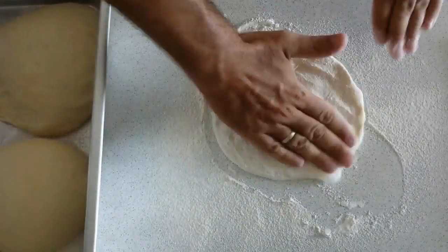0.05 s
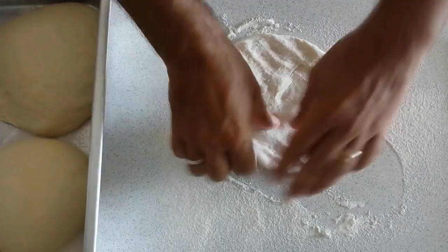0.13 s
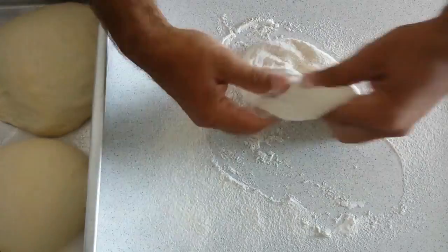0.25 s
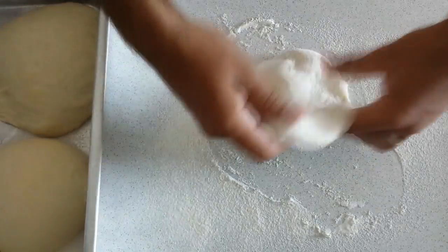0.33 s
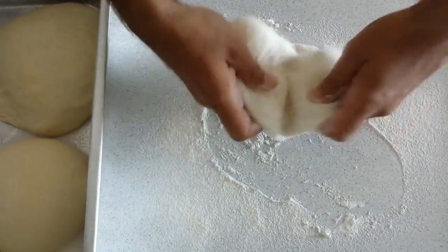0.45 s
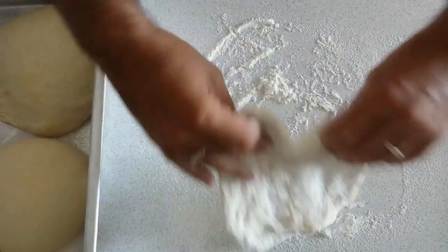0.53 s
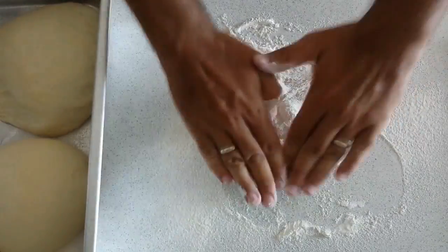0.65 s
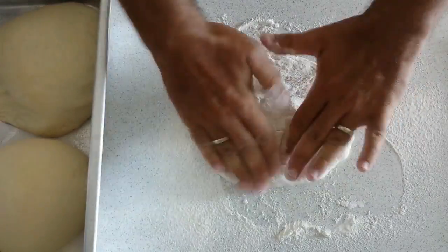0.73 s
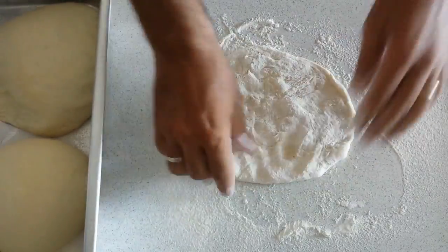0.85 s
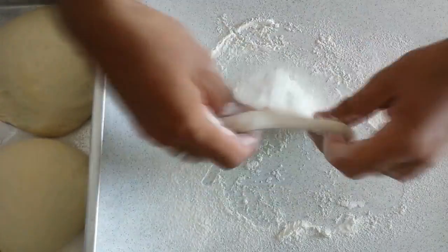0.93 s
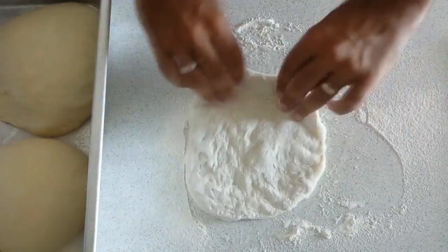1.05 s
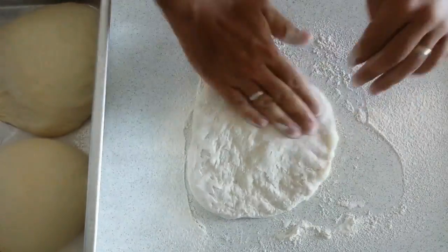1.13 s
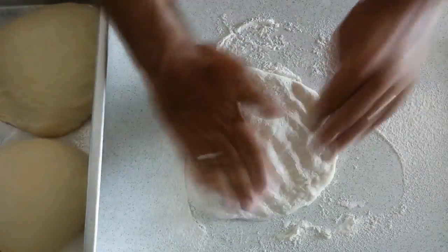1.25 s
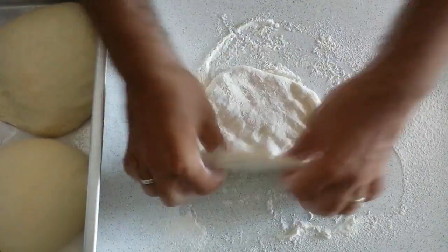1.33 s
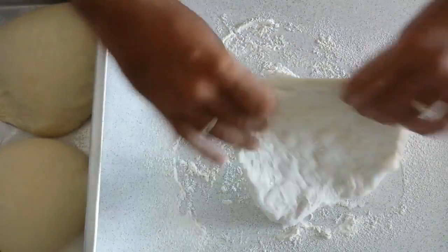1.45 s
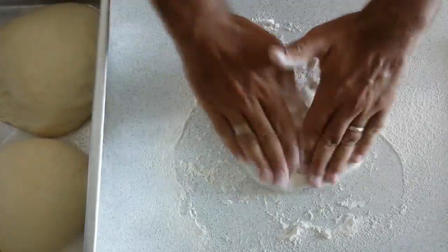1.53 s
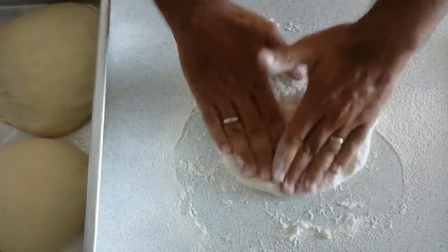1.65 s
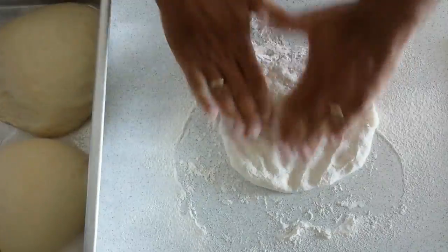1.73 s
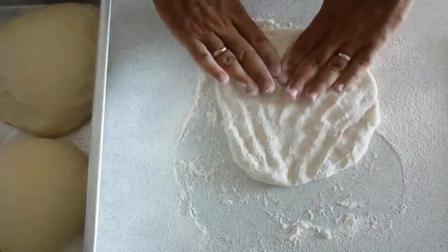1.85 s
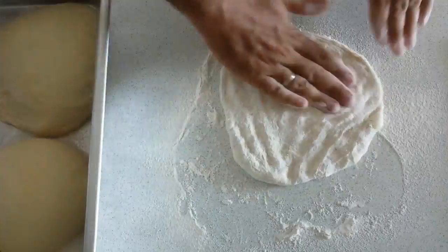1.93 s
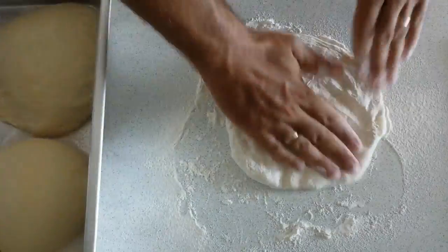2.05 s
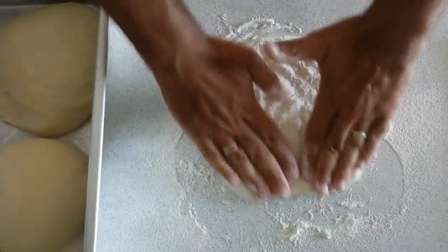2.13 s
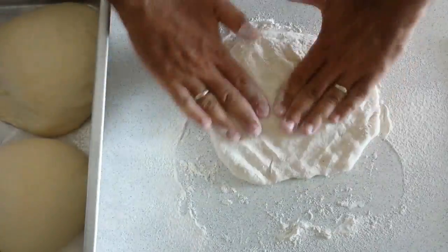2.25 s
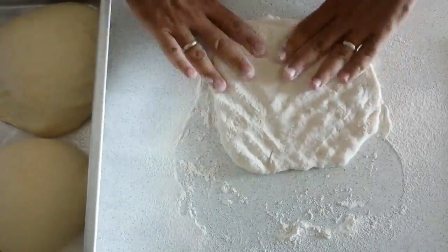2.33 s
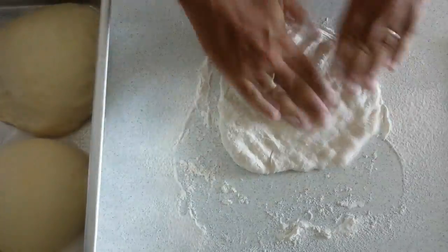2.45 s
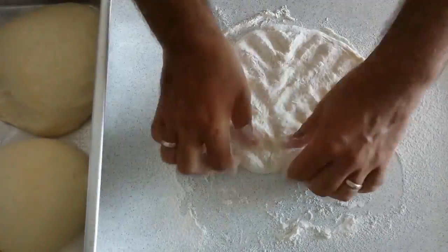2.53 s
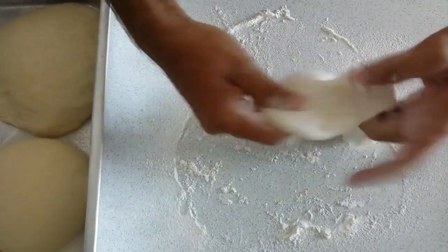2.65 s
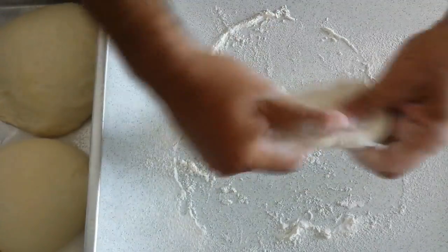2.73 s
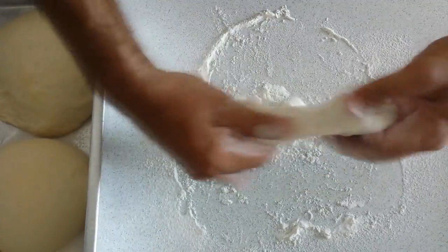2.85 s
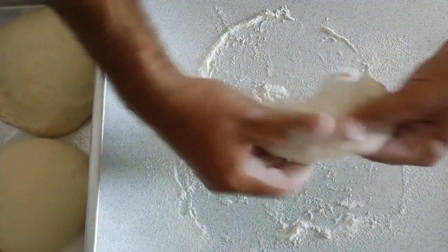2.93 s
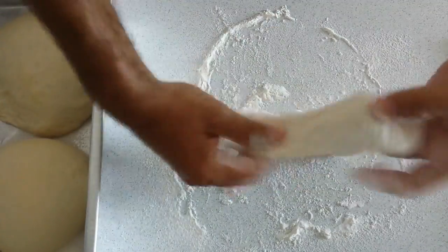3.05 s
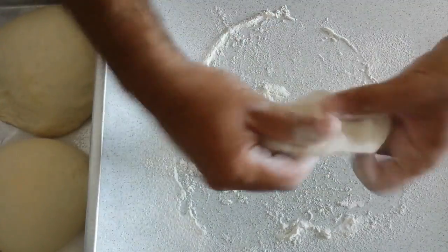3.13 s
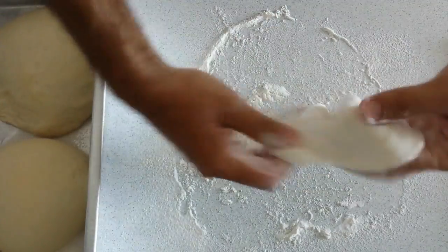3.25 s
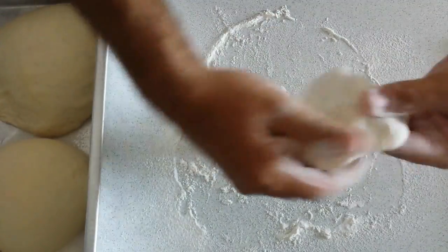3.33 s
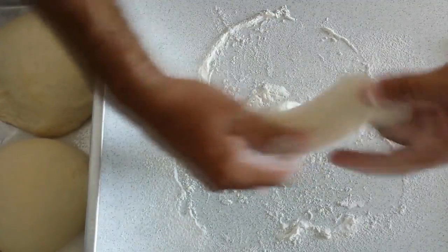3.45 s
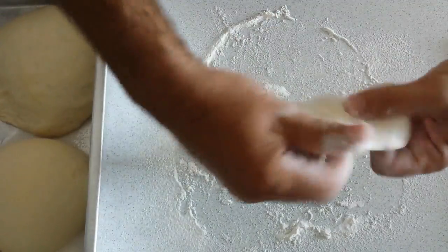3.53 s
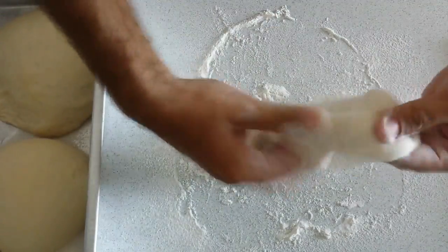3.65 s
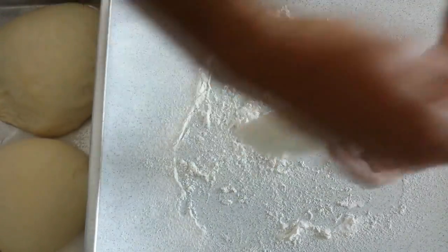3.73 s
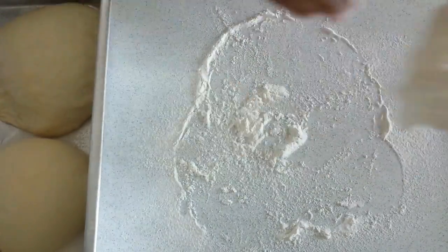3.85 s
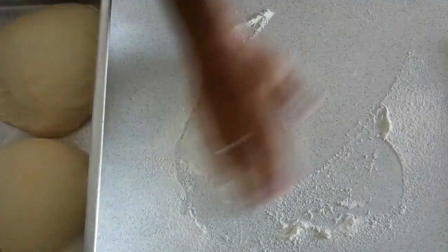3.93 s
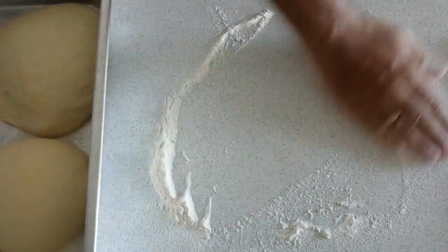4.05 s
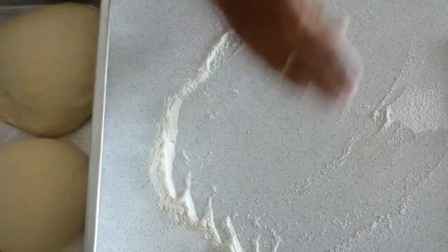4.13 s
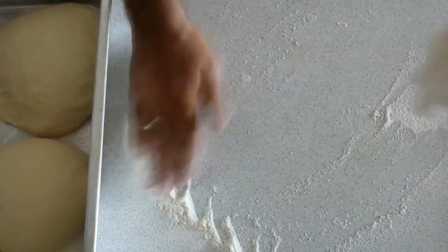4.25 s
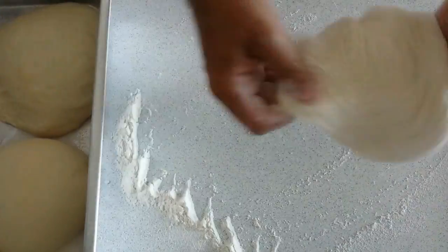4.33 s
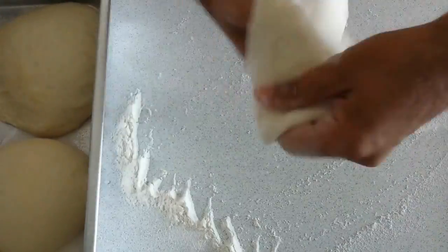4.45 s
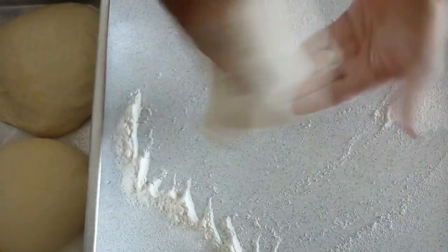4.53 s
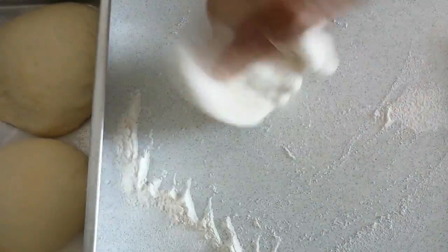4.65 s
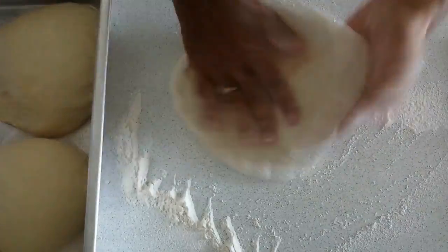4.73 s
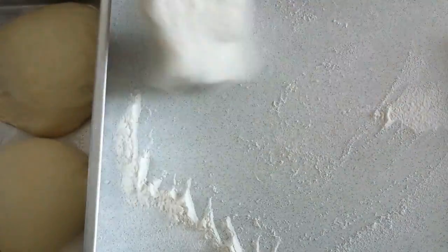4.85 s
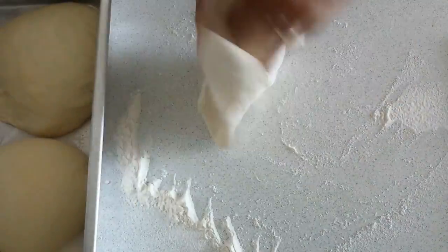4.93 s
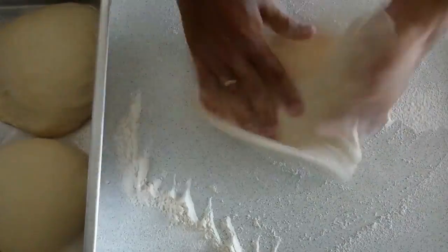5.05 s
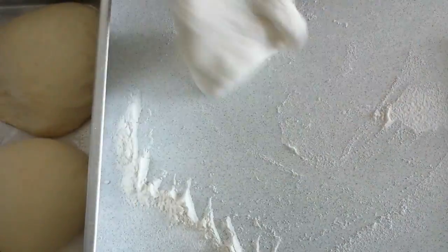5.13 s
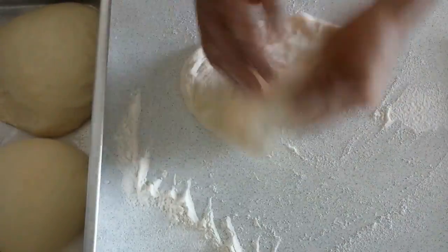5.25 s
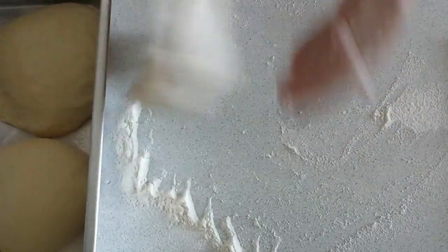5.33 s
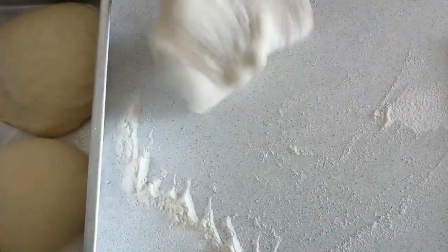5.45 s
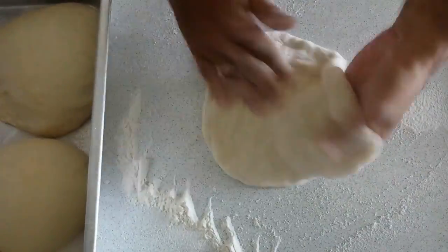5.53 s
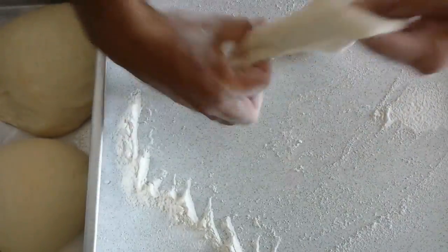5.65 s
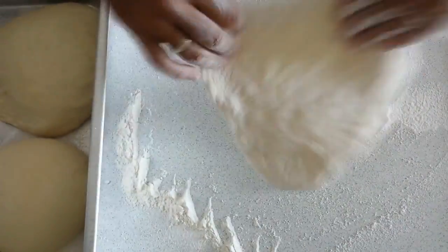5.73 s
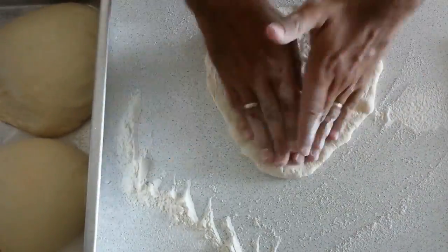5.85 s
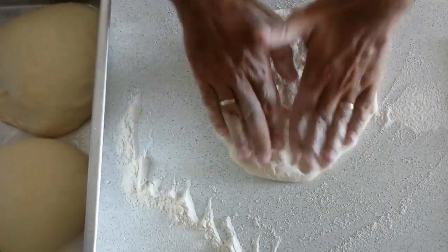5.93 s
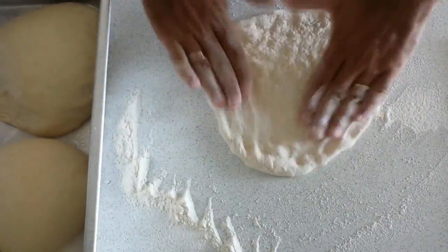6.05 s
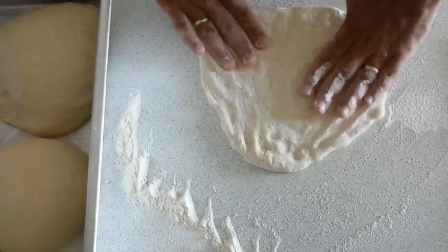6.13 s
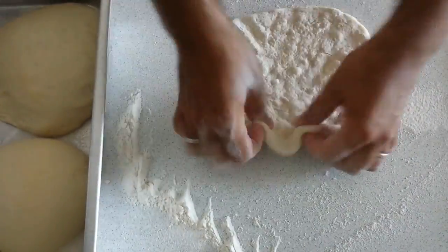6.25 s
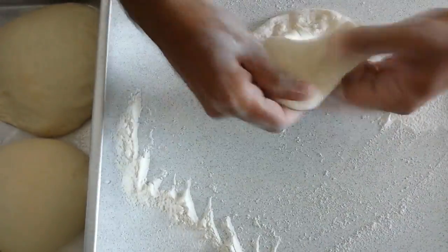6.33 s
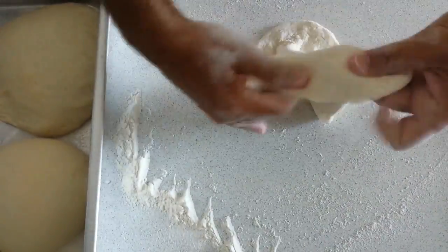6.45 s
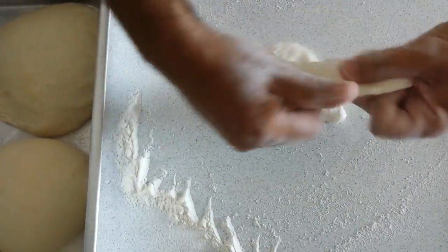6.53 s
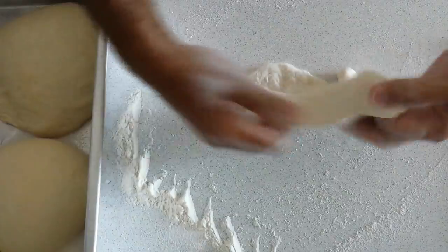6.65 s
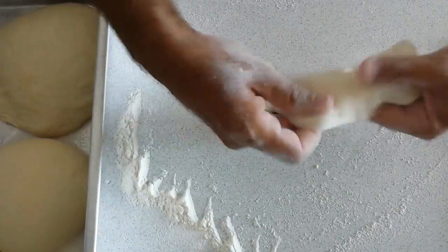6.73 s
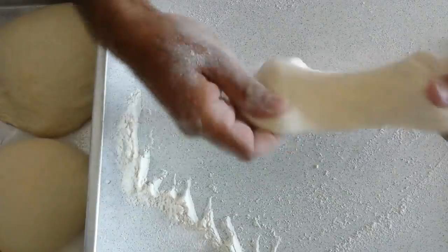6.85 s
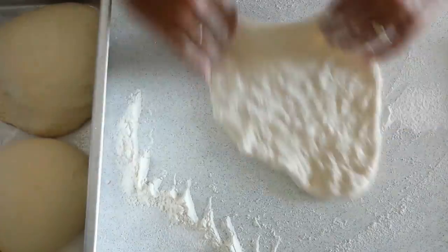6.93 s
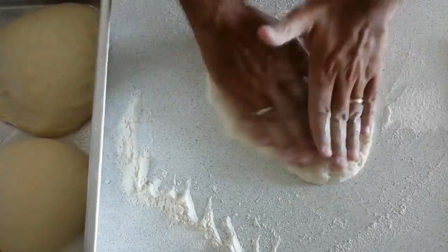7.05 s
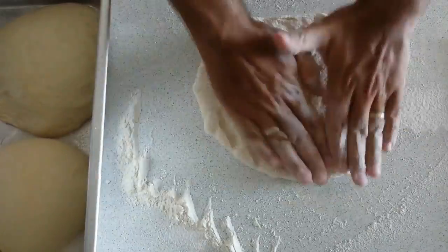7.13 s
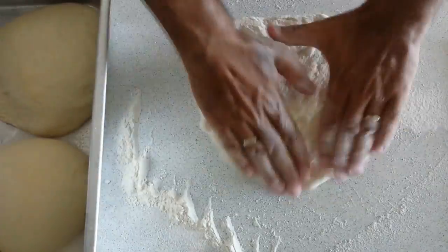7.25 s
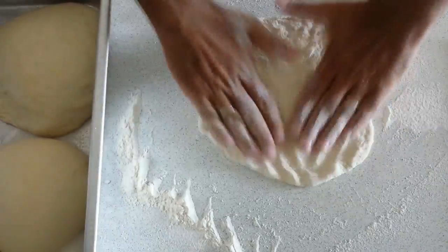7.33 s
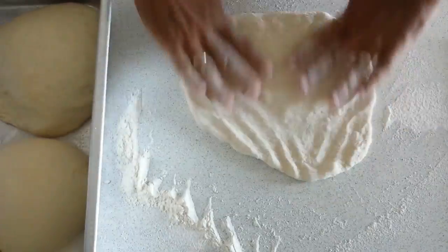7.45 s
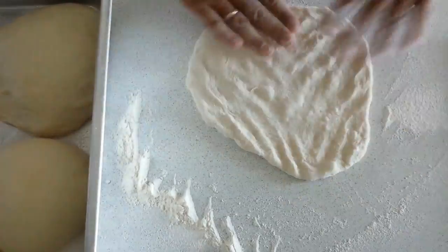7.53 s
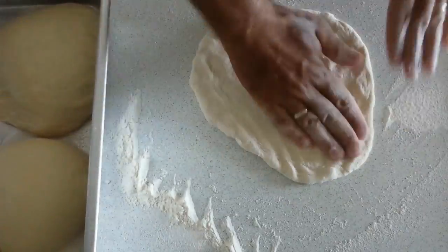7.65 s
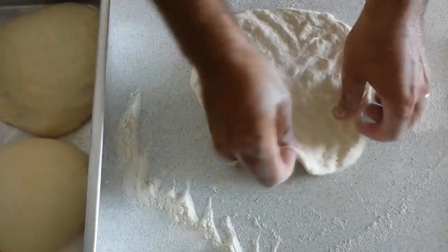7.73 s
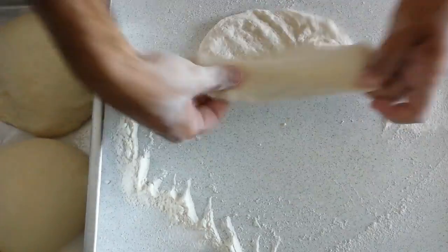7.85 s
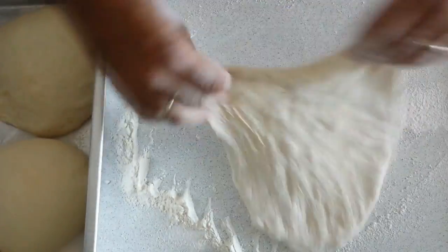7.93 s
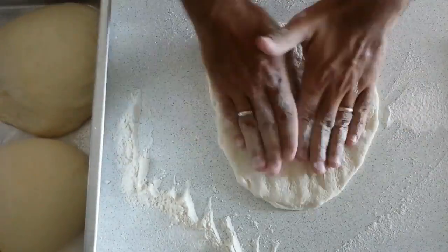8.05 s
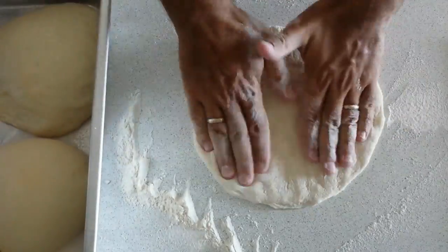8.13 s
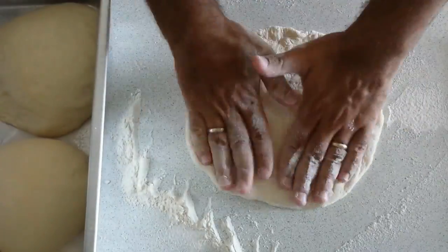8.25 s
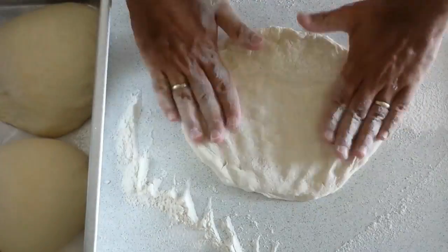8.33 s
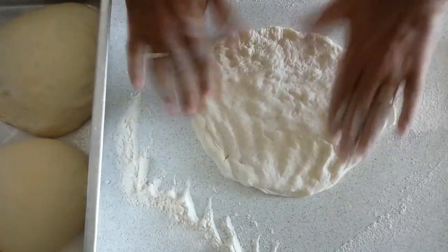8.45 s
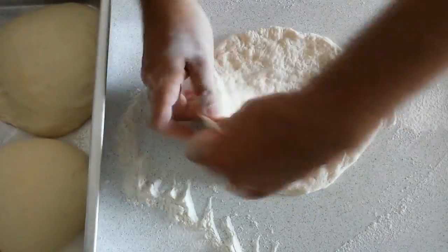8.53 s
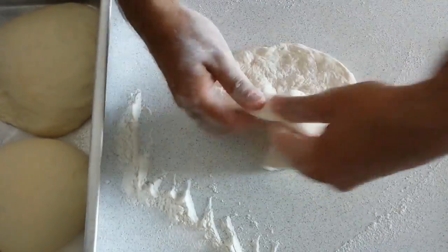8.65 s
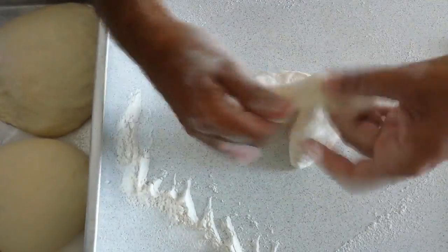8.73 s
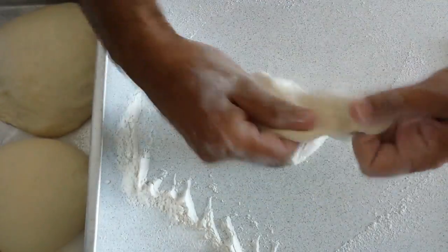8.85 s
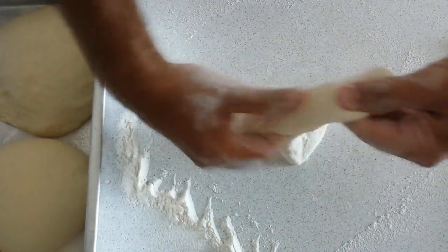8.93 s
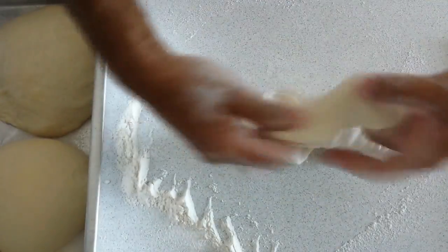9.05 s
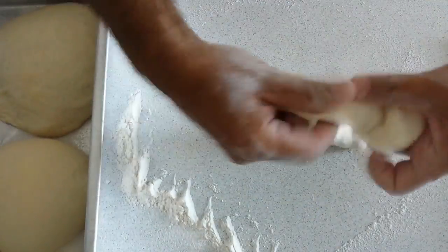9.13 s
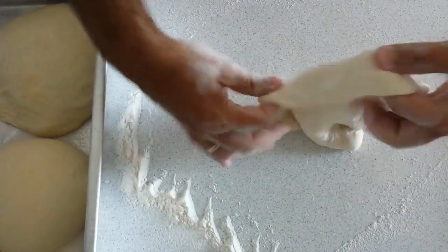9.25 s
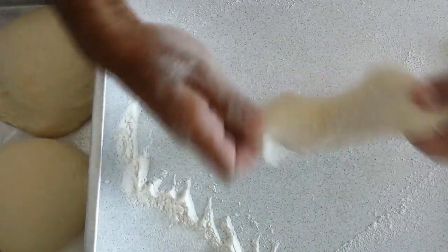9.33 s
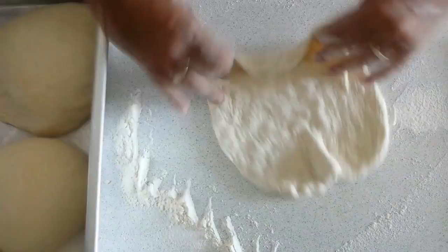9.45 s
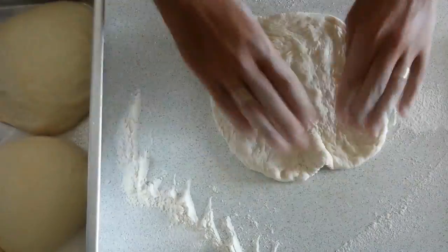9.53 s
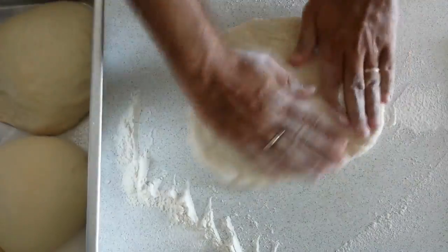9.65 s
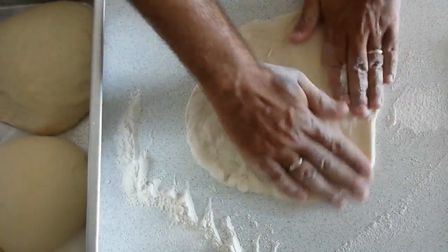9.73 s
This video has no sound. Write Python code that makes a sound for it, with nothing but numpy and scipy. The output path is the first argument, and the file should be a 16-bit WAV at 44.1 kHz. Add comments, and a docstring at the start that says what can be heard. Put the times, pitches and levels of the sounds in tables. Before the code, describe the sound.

Hands work soft dough on a floured counter, close to a stereo microphone and slightly to the right. For the first 2.7 seconds, soft, irregular pats thump the worktop with light knocks and finger ticks. From about 3 seconds the lifted dough rasps quietly through floury fingers. Just after 4 seconds a hand sweeps flour aside in three quick, hissing strokes. Between 4.7 and 5.9 seconds the dough slaps from palm to palm with hollow claps and thumps, loudest around 5.5. A few light pats and more rubbing follow, then firmer pats from 7.4 seconds, hardest near 7.8, and another pair at 8.5. The fingers rub again around 9 seconds, and one last slap lands at 9.6. Throughout, the kneading rumbles faintly in the counter over the slight hiss and hum of a small kitchen.

```python
"""Pizza dough on a floured kitchen counter, close under a camera's stereo microphone. First soft pats thump the
worktop. The dough is lifted and fed through rasping, floury fingers, and at 4 s a hand sweeps the flour aside.
Then the dough slaps from palm to palm, clapping out trapped air. The pats return, hardest near 7.8 s, and one
last slap follows. All along, the kneading rumbles in the counter with a low, wavering hum, and the small room
hisses faintly."""
import sys
import numpy as np
from scipy import signal
from scipy.fft import rfft, irfft, next_fast_len
from scipy.io import wavfile
from scipy.ndimage import map_coordinates

SR = 44100
rng = np.random.default_rng(int(sys.argv[2]) if len(sys.argv) > 2 else 0)


def waveform_to_disk(signal):
    """Save audio, clipped to [-1, 1], as 16-bit WAV at the path in sys.argv[1]."""
    frames = np.transpose(np.atleast_2d(signal))
    scaled = np.clip(frames, -1, 1) * 32767
    samples = np.round(scaled).astype(np.int16)
    wavfile.write(sys.argv[1], SR, samples)


N = 431738
TIME = np.arange(N) / SR


# The worktop's low modes. Each row: pitch in Hz, t60 in seconds, level in dB.
THUMP_MODES = [(129, 0.064, 1), (71.3, 0.028, -2), (196, 0.055, -9)]
# Its higher modes, woken by firm contact. Each row: pitch in Hz, t60 in seconds, level in dB.
KNOCK_MODES = [(360, 0.04, -2), (283.6, 0.024, 6.5), (496, 0.019, -8)]
# Dough pressed on the worktop, close under the microphone.
# Each row: start in seconds, relative level in dB, relative weight of the knock in dB.
PATS = [(0.236, -35, -26), (0.313, -39, -10), (0.898, -29, -16.5), (1.171, -38.5, -1.5),
        (1.366, -20.5, -23), (1.419, -32.5, -21), (1.499, -26, -21), (1.618, -37.5, -37), (1.815, -37, -15),
        (2.045, -34, -26), (2.102, -27, -20), (2.447, -29.5, -18), (2.553, -34.5, -11.5),
        (2.608, -25, -19.5), (2.703, -30.5, -20.5), (6.383, -28.5, -16), (6.407, -31, -6),
        (6.862, -33.5, -7), (7.444, -28, -21.5), (7.574, -35, -18), (7.672, -27, -38), (7.717, -16, -17.5),
        (7.775, -11, -20.5), (7.803, -21.5, -20), (7.904, -36.5, -9.5), (8.502, -19.5, -20),
        (8.54, -26.5, -18), (8.684, -39, -14)]

def pats():
    """Soft dough passes only a dull push to the worktop; firmer pats add a knock."""
    out = np.zeros((2, N))
    for s, db, knock_db in PATS:
        thump = worktop(THUMP_MODES, attack_s=0.0024, phase_spread=0.55)
        knock = worktop(KNOCK_MODES, attack_s=0.0032, phase_spread=0.49)
        add(out, s, amp(db - 1) * (thump + amp(knock_db + 6) * knock))
    return out


def worktop(modes, attack_s, phase_spread):
    """The worktop rings; each side of the microphone meets each bending wave at its own phase."""
    t = np.arange(SR // 4) / SR
    ring = 0
    for hz, t60, db in modes:
        pitch = hz * np.exp(0.029 * rng.standard_normal())
        phase = phase_spread * rng.standard_normal() * np.array([[1], [-1]])
        ring = ring + amp(db - 60 * t / t60) * np.sin(2 * np.pi * pitch * t + phase)
    ring *= 1 - np.exp(-(t / attack_s) ** 2)
    return ring / np.sqrt(np.mean(ring ** 2, axis=0)).max()


# A slap's air clap, palm boom and skin smack. Each row: frequency in Hz, level in dB.
CLAP_SPECTRUM = [(200, -35), (400, -4), (560, -5), (800, -1.5), (1400, -5.5), (2000, -3), (2700, -15),
                 (4000, -13), (9000, -34)]
BOOM_SPECTRUM = [(150, -43), (270, 1), (340, -0.5), (385, 6.5), (440, -6), (540, -20.5), (800, -57.5)]
SMACK_SPECTRUM = [(900, -30), (2200, 9), (3200, 2.5), (5600, 2.5), (7000, -3.5), (10000, -8), (15500, -15)]
# Dough meeting the palms, above the counter. Each row: time in seconds, relative levels of thump,
# boom, clap and smack in dB, air pocket pitch in Hz, closing time in seconds.
SLAPS = [(4.068, -43, -43, -34, -43, 1610, .015), (4.117, -34.5, -43, -28.5, -37.5, 1410, 0.011),
         (4.743, -42, -27.5, -32, -42, 646, 0.0067), (4.754, -36, -29, -27, -56, 770, 0.02),
         (4.883, -31, -34, -40, -58, 800, 0.028), (4.919, -29.5, -27.5, -25.5, -31.5, 960, 0.013),
         (5.059, -12.5, -26, -25, -30, 890, 0.026), (5.219, -22, -28, -18.5, -26.5, 950, 0.011),
         (5.23, -22.5, -29.5, -29.5, -54, 850, 0.011), (5.38, -15.5, -24.5, -24, -31.5, 856, 0.013),
         (5.539, -10.5, -18.5, -16.5, -26.5, 1400, 0.019), (5.703, -32, -32.5, -30, -30.5, 1300, 0.019),
         (5.923, -25, -35.5, -28.5, -30.5, 1000, 0.0095), (7.099, -38, -36, -34, -36.5, 1400, 0.0083),
         (9.607, -18, -33.5, -25.5, -33.5, 1230, 0.0089)]

def slaps():
    """Skin smacks on dough, trapped air claps and booms in the palm, and the dough's weight thumps."""
    out = np.zeros((2, N))
    for s, thump_db, boom_db, clap_db, smack_db, pocket_hz, closing_s in SLAPS:
        clap_colour = lambda hz: along(CLAP_SPECTRUM, hz) + hollow_db(hz) + pocket_db(hz, pocket_hz, 5.5)
        clap = puff(clap_colour, rise_s=closing_s, t60=0.053)
        boom = puff(lambda hz: along(BOOM_SPECTRUM, hz), rise_s=closing_s, t60=0.057)
        smack = puff(lambda hz: along(SMACK_SPECTRUM, hz), rise_s=2.06 * closing_s, t60=0.069)
        slap = amp(clap_db + 2.5) * clap + amp(boom_db + 1) * boom + amp(smack_db - 2) * smack
        thump = worktop(THUMP_MODES, attack_s=0.0031, phase_spread=0.92)
        add(out, s - PUFF_PEAK_S, slap)
        add(out, s - 0.002, amp(thump_db + 0.5) * thump)
    return out


PUFF_PEAK_S = 0.05

def puff(colour_db, rise_s, t60):
    """Air squeezed out as a contact closes: it swells to a peak and dies."""
    t = np.arange(SR // 4) / SR - PUFF_PEAK_S
    envelope = amp(60 * np.minimum(t / rise_s, -t / t60))
    air = noise(colour_db, size=len(t)) * envelope
    return unit(air) * np.sqrt(np.mean(envelope ** 2))


def pocket_db(hz, centre_hz, lift_db):
    """A trapped air pocket favours the band round its own pitch."""
    return lift_db * np.exp(-(np.log2((hz + 1) / centre_hz) / 0.51) ** 2)


# Fixed resonances that colour sounds near the counter. Each row: centre in Hz, width in Hz, gain in dB.
HOLLOWS = [(370, 27, 15.5), (870, 20, 10.5), (1093, 63, -3), (1360, 92, 1.5), (1770, 92, -1),
           (2030, 130, -2), (2540, 100, 5)]

def hollow_db(hz):
    """The fixed resonances colour a sound with narrow peaks and dips."""
    return sum(db / (1 + (2 * (hz - centre) / width) ** 2) for centre, width, db in HOLLOWS)


# Light finger taps, close by. Each row: time in seconds, relative level in dB, hollow pitch in Hz.
TAPS = [(.318, -39, 730), (0.733, -42, 800), (0.9, -46, 790), (4.871, -33, 403), (7.67, -41, 1710),
        (8.119, -40, 940), (8.473, -44, 4500)]

def taps():
    """Fingertips land with small hollow ticks, alone or with a pat: the firmer its knock, the louder."""
    out = np.zeros((2, N))
    with_pats = [(s, -25.5 + 0.41 * (db + knock_db), 700) for s, db, knock_db in PATS]
    for s, db, tap_hz in TAPS + with_pats:
        colour = lambda hz: along(CLAP_SPECTRUM, hz) / 2 + pocket_db(hz, tap_hz, lift_db=9.5)
        add(out, s - PUFF_PEAK_S, amp(db - 4.5) * puff(colour, rise_s=0.0076, t60=0.066))
    return out


# The rasp of floury skin and the high hiss of dry flour. Each row: frequency in Hz, level in dB.
RASP_SPECTRUM = [(500, -3), (1100, -9.5), (1600, 1.5), (2500, 0.5), (3600, 2), (5500, 2), (7500, -4.5),
                 (10000, -9), (15500, -12.5)]
DRY_SPECTRUM = [(3000, -31), (6000, -3), (9000, 1.5), (15500, 1)]
# Single slips of skin over dough, heard close.
# Each row: middle in seconds, peak in dB, length in seconds, relative weight of dry hiss in dB.
SLIPS = [(0.052, -54, 0.012, 0), (0.743, -51, 0.019, 2), (1.047, -52.5, 0.012, -5), (1.64, -53.5, 0.019, 3),
         (1.818, -50, 0.0058, -14), (1.927, -59, 0.089, 9), (2.396, -46.5, 0.019, -4),
         (4.655, -45.5, 0.016, -7), (6.229, -49.5, 0.0066, 15), (7.121, -47.5, 0.035, -6),
         (7.243, -52, 0.025, 5), (7.619, -44, 0.014, 3), (8.049, -52.5, 0.03, 5), (8.137, -48, 0.023, 6),
         (8.491, -50, 0.015, -7), (8.546, -52.5, 0.042, -7), (8.79, -52, 0.043, 6), (9.637, -49, 0.033, -1),
         (9.757, -47.5, 0.015, 0)]
# Dough fed through the fingers. Each row: first and last grip in seconds, peak in dB.
GRIP_RUNS = [(1.418, 1.556, -55.5), (3, 3.402, -46.5), (3.524, 3.67, -51.5), (6.607, 6.932, -46),
             (7.515, 7.569, -47), (9.123, 9.406, -48.5)]
GRIP_GAP_S, STRAY_SLIPS_PER_S = 0.067, 2

def slips():
    """Floury skin slides singly, in even runs of grips and faintly by chance; drier flour hisses higher."""
    grips = [(s, db, 0.012, -1) for first, last, db in GRIP_RUNS
             for s in np.linspace(first, last, round((last - first) / GRIP_GAP_S) + 1)]
    stray_times = rng.random(round(STRAY_SLIPS_PER_S * N / SR)) * N / SR
    strays = [(s, -56.5, 0.01, 4) for s in stray_times]
    rasp, hiss = np.zeros(N), np.zeros(N)
    for s, db, length, dry_db in SLIPS + grips + strays:
        near = slice(max(round((s - 0.15) * SR), 0), round((s + 0.15) * SR))
        speed = amp(db) * np.exp(-2 * ((TIME[near] - s) / length) ** 2)
        rasp[near] += speed
        hiss[near] += amp(dry_db - 10.5) * speed
    return rasp * flour(RASP_SPECTRUM, grain_db=0.5) + hiss * flour(DRY_SPECTRUM, grain_db=1.5)


def flour(spectrum, grain_db):
    """Friction noise: flour grains catch and let go about every millisecond."""
    return unit(noise(lambda hz: along(spectrum, hz)) * amp(grain_db * wobble(900)))


# The hand's edge sweeps flour aside on the counter.
# Each row: middle in seconds, length in seconds, hiss in dB, drag in dB.
SWEEPS = [(4.095, 0.063, -42.5, -37), (4.244, 0.044, -43, -46), (4.389, 0.043, -42, -73)]

def sweeps():
    """Flour hisses under the hand; when it bears down, skin judders on the worktop."""
    hiss = sum(amp(db) * stroke(s, length) for s, length, db, _ in SWEEPS)
    drag = sum(amp(db) * stroke(s, length * 0.51) for s, length, _, db in SWEEPS)
    skin = noise(lambda hz: along(CLAP_SPECTRUM, hz) + hollow_db(hz))
    judder = unit(skin * amp(4.3 * wobble(250)))
    return hiss * flour(RASP_SPECTRUM, grain_db=1) + drag * judder


def stroke(s, length):
    """The speed of a hand movement: a smooth swell round time s."""
    return np.exp(-np.minimum(np.abs(2 * (TIME - s) / length), 10) ** 2.7 / 2)


# Counter rumble, floury rubbing and dough dragging. Each row: frequency in Hz, level in dB.
RUMBLE_SPECTRUM = [(15, -14.5), (35, -8), (70, -2.5), (105, -2.5), (135, 0), (158, 1), (185, -3.5),
                   (225, -8), (300, -13.5), (450, -33.5), (900, -52)]
RUB_SPECTRUM = [(600, -8), (1200, -2.5), (1700, 3), (2400, 0.5), (3500, 1), (4500, -0.5), (5300, 2),
                (6500, -2), (9000, -6.5), (15500, -10)]
DRAG_SPECTRUM = [(200, 2.5), (380, 2), (520, -5.5), (850, 0.5), (1300, -6), (2200, -12.5), (5000, -21)]
# Kneading under the microphone. Each row: time in seconds, relative levels of rumble and drag in dB.
KNEADING = [(0.0, -60, -66), (0.3, -56.5, -67.5), (0.6, -59.5, -69), (1.5, -53, -64.5), (1.85, -57, -64.5),
            (2.62, -54.5, -63), (3.43, -60.5, -65), (3.95, -59.5, -65), (4.47, -57.5, -61.5),
            (5.07, -53, -56), (5.89, -44, -56.5), (6.19, -52, -57.5), (7.14, -57.5, -64), (7.8, -60, -62.5),
            (8.15, -57, -67), (9.79, -58.5, -62.5)]
# Lifted dough rubs on the palms. Each row: start and end in seconds, relative level in dB.
LIFTS = [(2.764, 3.974, -60), (4.58, 5.874, -56.5), (6.526, 6.98, -57), (8.838, 9.493, -60)]
# The hands let go and the rustle drops. Each row: start and end in seconds, change in dB.
PAUSES = [(0.773, 1.028, -4), (3.974, 4.434, -8), (6.998, 7.172, -3.5), (9.53, 9.71, -4)]

def kneading():
    """Working the dough rumbles the counter and rustles the flour in fits; lifted dough rubs louder."""
    times, *levels = np.transpose(KNEADING)
    rumble_db, drag_db = [np.interp(TIME, times, db) for db in levels]
    pause_db = sum(db * during(start, end) for start, end, db in PAUSES)
    on_worktop = amp(-30.5 + 0.52 * drag_db + pause_db)
    on_palms = sum(amp(db) * during(start, end) for start, end, db in LIFTS)
    effort = wobble(35)
    low = noise(lambda hz: along(RUMBLE_SPECTRUM, hz)) + amp(-6.5) * hum()
    rumble = amp(rumble_db + 4.5 + 1.1 * effort + 0.56 * wobble(14)) * low
    rub = np.hypot(on_worktop, on_palms) * amp(3 + 1.87 * effort) * flour(RUB_SPECTRUM, grain_db=2)
    drag = noise(lambda hz: along(DRAG_SPECTRUM, hz) + 0.3 * hollow_db(hz))
    return rumble + rub + amp(drag_db + 3.5 + 1.5 * effort) * drag


def hum(centre_hz=154.6):
    """A low hum whose pitch and strength waver."""
    pitch = centre_hz * np.exp(0.0503 * wobble(9))
    return unit(np.sin(2 * np.pi * np.cumsum(pitch) / SR) * amp(4.8 * wobble(11)))


# The small kitchen's decay, heard from the counter. Each row: frequency in Hz, t60 in seconds.
KITCHEN_DECAY = [(100, 0.24), (500, 0.24), (2000, 0.21), (10000, 0.13)]

def kitchen(x):
    """Cupboards and walls answer with a short diffuse tail."""
    hz, t, spectra = signal.stft(rng.standard_normal((2, SR // 2)), SR, nperseg=256)
    decay = amp(-60 * t / along(KITCHEN_DECAY, hz)[:, None])
    onset = 1 - np.exp(-t / 0.0029)
    _, tail = signal.istft(spectra * decay * onset, SR, nperseg=256)
    return signal.fftconvolve(x, tail / np.linalg.norm(tail[0]), axes=1)[:, :N]


# Room tone at the microphone. Each row: frequency in Hz, level in dB.
ROOM_SPECTRUM = [(180, -34), (300, 0.5), (417, 3), (526, -1), (953, -7.5), (1300, -10), (1700, -27),
                 (3070, -33), (5300, -13), (8840, -16), (15500, -12)]

def room_tone():
    """The room's steady hiss, behind the hands."""
    return noise(lambda hz: along(ROOM_SPECTRUM, hz))


# How alike the microphone's two sides are. Each row: frequency in Hz, left-right correlation.
STEREO_LIKENESS = [(40, 0.17), (130, 0.087), (400, 0.073), (1000, 0.057), (2500, 0.048), (8000, 0.044)]

def noise(colour_db, size=N):
    """Wide stereo noise of rms 1, its sides slightly more alike in the bass."""
    def mid_side_gains(hz):
        angle = np.arccos(along(STEREO_LIKENESS, hz)) / 2
        return amp(colour_db(hz)) * [np.cos(angle), np.sin(angle)]
    mid, side = filtered(rng.standard_normal((2, size)), mid_side_gains)
    return unit(np.array([mid + side, mid - side]))


def amp(db):
    """Decibels to gain."""
    return 10 ** (np.asarray(db) / 20)


def unit(x):
    """Scale to rms 1."""
    return x / np.sqrt(np.mean(x ** 2) + 1e-20)


def along(points, hz):
    """(Hz, value) points read on a log axis."""
    freqs, values = np.transpose(points)
    return np.interp(np.log(hz + 1), np.log(freqs + 1), values)


def wobble(rate):
    """A smooth random curve, rate knots a second."""
    return map_coordinates(rng.standard_normal(int(N * rate / SR) + 4), [TIME * rate])


def during(start, end, ramp_s=0.035):
    """1 between two times and 0 outside, with short ramps."""
    return np.clip(np.minimum(TIME - start, end - TIME) / ramp_s + 0.5, 0, 1)


def filtered(x, response):
    """Filter x by a gain that depends on frequency."""
    n = x.shape[-1]
    padded = next_fast_len(n + 8192)
    return irfft(rfft(x, padded) * response(np.fft.rfftfreq(padded, 1 / SR)), padded)[..., :n]


def add(track, s, sound):
    """Mix a stereo sound in at time s."""
    start = max(round(s * SR), 0)
    track[:, start:start + sound.shape[1]] += sound[:, :N - start]


# Balance at the microphone. Each row: frequency in Hz, level of the right side over the left in dB.
RIGHT_LEAN = [(60, 6), (140, 2.5), (300, 5.5), (1000, 3.5), (2000, 3), (4000, 7), (8000, 5.5), (13000, 6.5)]

def scene():
    """Hands and dough up close, the kitchen faint behind them, all leaning to the right."""
    hands = pats() + slaps() + taps() + slips() + sweeps()
    mix = hands + amp(-23) * kitchen(hands) + kneading() + amp(-66) * room_tone()
    return filtered(mix, lambda hz: amp(along(RIGHT_LEAN, hz) * np.array([[-1], [1]]) / 2))


def record(dry):
    """The camera keeps nothing above its band limit."""
    return filtered(dry, lambda hz: hz < 15750)


dry = scene()
out = record(dry)
waveform_to_disk(out)
```